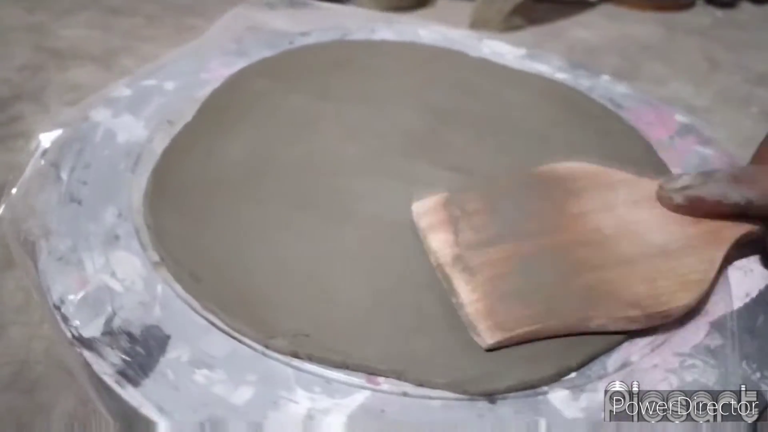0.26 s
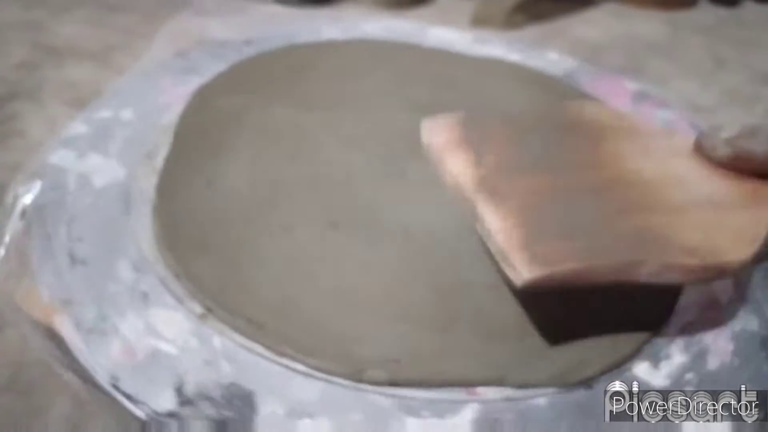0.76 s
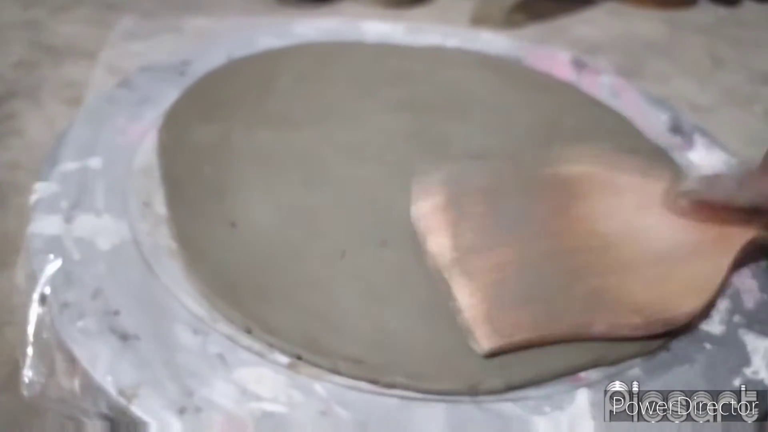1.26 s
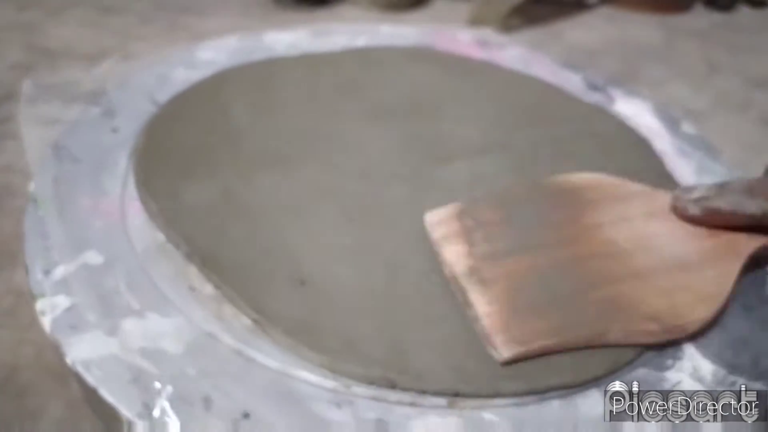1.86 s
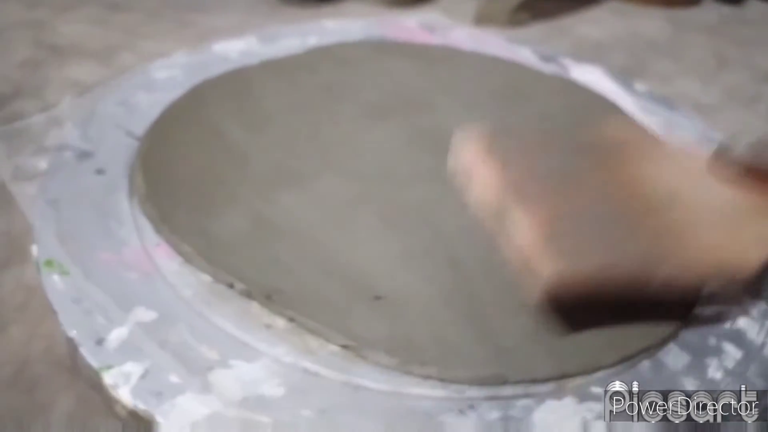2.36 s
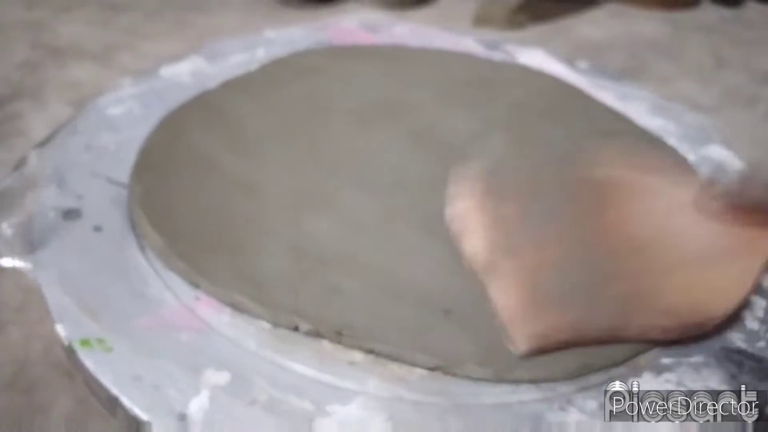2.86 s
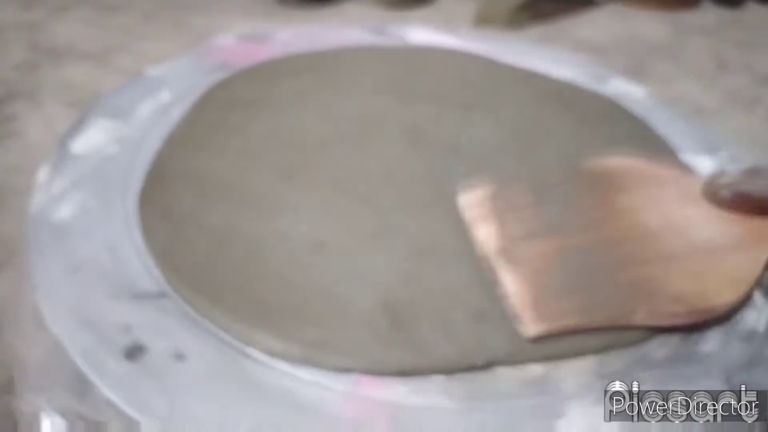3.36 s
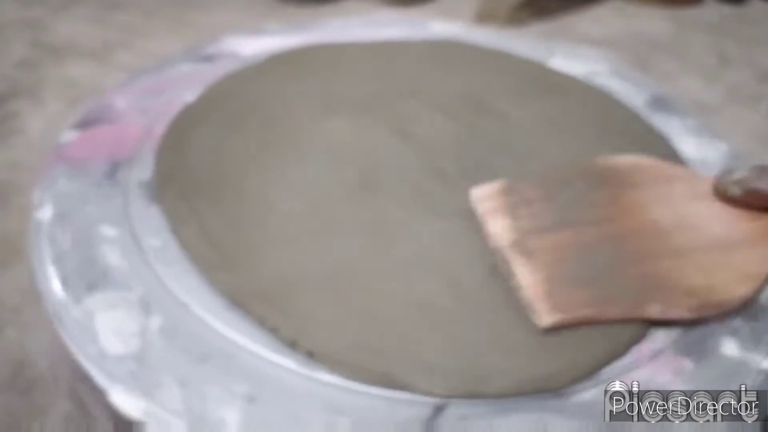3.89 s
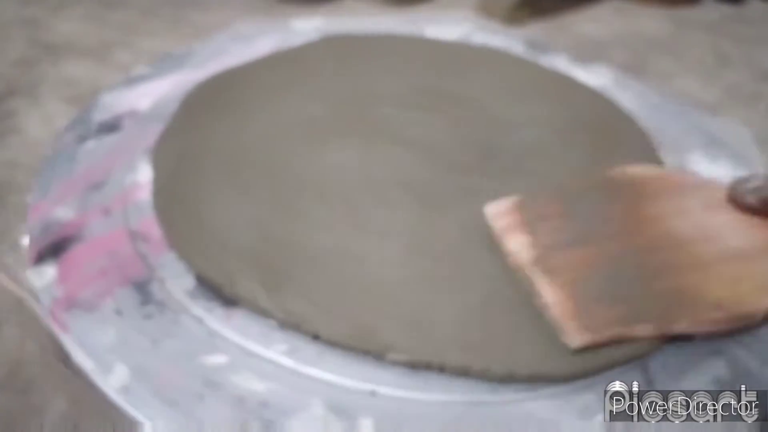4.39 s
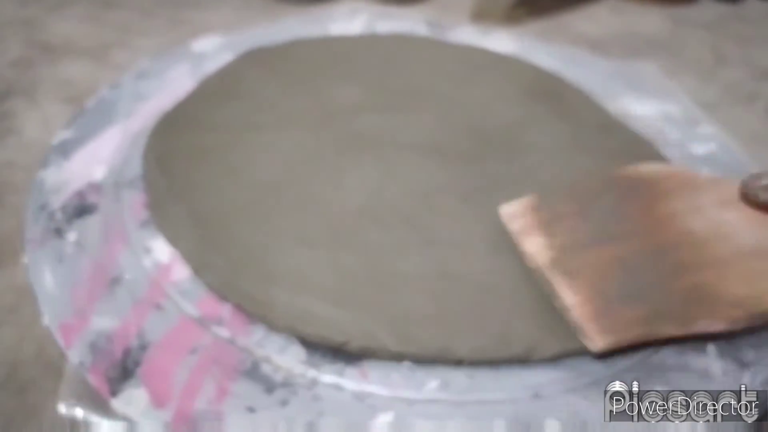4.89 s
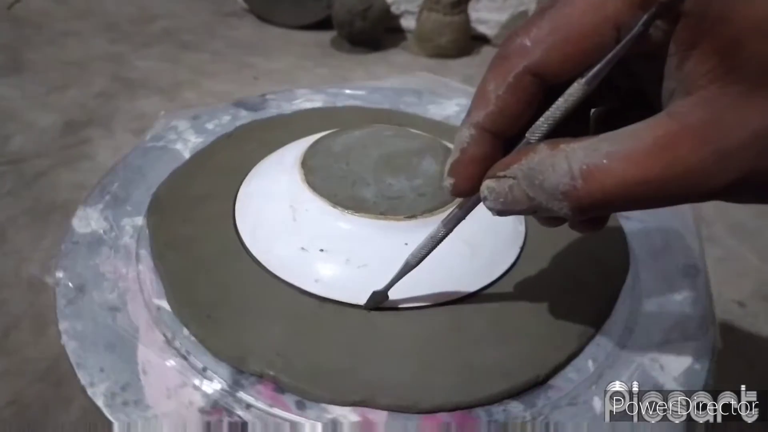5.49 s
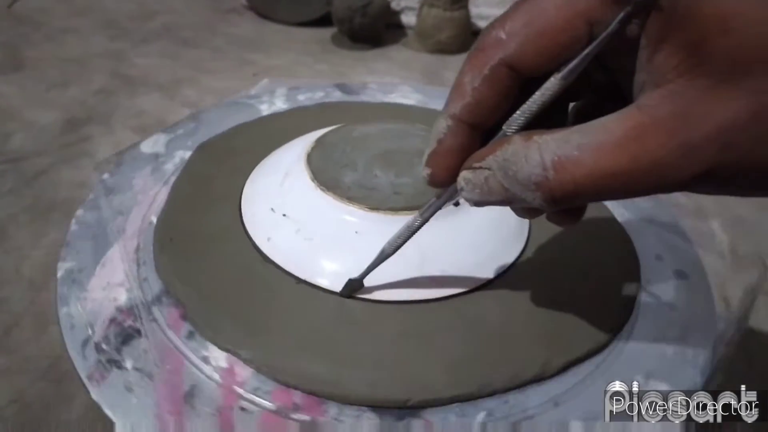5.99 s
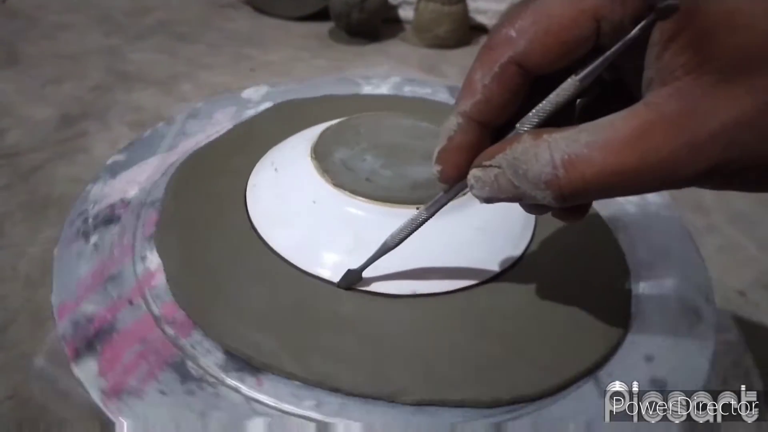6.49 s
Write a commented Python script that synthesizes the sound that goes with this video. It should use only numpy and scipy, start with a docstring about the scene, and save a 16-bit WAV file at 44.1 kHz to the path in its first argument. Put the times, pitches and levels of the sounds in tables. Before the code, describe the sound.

Close to the microphone in a small room, a flat wooden paddle pats wet clay about six times a second. Each pat is a crisp wet slap with a hollow pop and a soft board thud, with small sticky ticks and peeling crackle between. Near six seconds the sound drops to total silence briefly, then a needle tool drags faintly through clay, ticking against a dish over quiet room air.

```python
"""A flat wooden paddle pats a wet clay slab about six times a second in a small room, close to the microphone.
Each pat is three bands of shaped noise (clack, slap, spit), then sinking damped cycles for the hollow pop of
trapped air and the thud of the board, with a dull noise push, ringing modes and a diffuse room answer.
The clay clings and peels off with ticks and crackle. After a short silence a needle tool faintly clicks and
scrapes round a dish, cutting the slab. Behind lie room air, a wavering hum, thin hiss and handling rumble."""
import sys
import numpy as np
from scipy import signal
from scipy.fft import rfft, irfft, next_fast_len
from scipy.io import wavfile
from scipy.ndimage import uniform_filter1d

SR = 44100
rng = np.random.default_rng(int(sys.argv[2]) if len(sys.argv) > 2 else 0)


def unload_wav(signal):
    """Save mono or channel-first audio to the path in sys.argv[1] as 16-bit WAV at rate SR, clipped to [-1, 1]."""
    wavfile.write(
        sys.argv[1],
        SR,
        np.round(np.clip(np.atleast_2d(signal).T, -1, 1) * 32767).astype(np.int16),
    )


N = 297234
TIME = np.arange(N) / SR
LEAD = 64  # samples of run-up before each crack


def amp(db):
    """Decibels to gain."""
    return 10 ** (np.asarray(db) / 20)


def unit(x):
    """Scale to rms 1."""
    return x / np.sqrt(np.mean(x ** 2) + 1e-20)


def burst(x):
    """Scale a short sound to the energy of 10 ms at rms 1."""
    return unit(x) * np.sqrt(0.01 * SR / x.shape[-1])


def along(points, hz):
    """Read (frequency [Hz], value) points on a log frequency axis."""
    f, v = np.transpose(points)
    return np.interp(np.log(hz + 1), np.log(f + 1), v)


def filtered(x, response):
    """Multiply the spectrum of x by a response given as a function of frequency."""
    n = x.shape[-1]
    m = next_fast_len(n + 2048)  # spare length against wrap-around
    return irfft(rfft(x, m) * response(np.fft.rfftfreq(m, 1 / SR)), m)[..., :n]


def peak(f, hz, width):
    """One resonance: gain 1 at its centre, one half at the edges of its width."""
    return 1 / (1 + (2 * (f - hz) / width) ** 2)


def noise(spectrum, n, mono_hz):
    """Stereo noise of rms 1, whose channels grow more alike below mono_hz."""
    def response(f):
        side_gain = (f + mono_hz / 4) / (f + mono_hz)
        return amp(along(spectrum, f)) * np.array([np.ones_like(f), side_gain])

    mid, side = filtered(rng.standard_normal((2, n)), response)
    return unit(np.array([mid + side, mid - side]))


def add(track, s, sound):
    """Mix a sound into the track from time s."""
    i = max(round(s * SR), 0)
    track[:, i:i + sound.shape[-1]] += sound[..., :N - i]


def swell(t, peak_s, power):
    """An envelope that rises to 1 at peak_s and dies away."""
    u = np.maximum(t, 0) / peak_s
    return (u * np.exp(1 - u)) ** power


def hump(s, db, width_s):
    """A gain that swells smoothly to its top at time s, down to 1/e of it width_s to either side."""
    return amp(db) * np.exp(-((TIME - s) / width_s) ** 2)


# the ordinary blow, from which harder and wetter ones depart
USUAL_FORCE_DB, USUAL_WET_DB = -34, 3
# a harder blow squeezes the air pocket smaller, so it pops higher
POP_HZ, POP_HZ_PER_DB = 548, 6
# as the slab is beaten firm, the pop rises and the spit fades
POP_RISES_HZ_PER_S, SPIT_FADES_DB_PER_S = 12, 0.41
# slap and spit in the ordinary blow, and the dB they gain for each dB of force or wetness
SLAP_DB, SLAP_GROWTH = -30, 1.12
SPIT_DB, SPIT_GROWTH = -30, 0.83
# the clay cushions the board: it takes only a share of each dB of force and wetness
BOARD_DB, BOARD_PER_FORCE, BOARD_PER_WET = -36.5, 0.2, 0.23
# dB per dB of trapped air: it softens the thud, and adds to the dull push that follows
THUD_LOSS_PER_AIR, WEIGHT_PER_AIR = 0.4, 0.28

# paddle blows, close to the microphone: (time [s], force and clack level [dB], trapped air over the force [dB],
# wetness of the contact over the force [dB], pitch of the slap [Hz])
BLOWS = [(0.0276, -38, 2.5, -2, 3980), (0.1854, -34.5, 1.5, 1.5, 4740), (0.3438, -34.5, 3, 0.5, 4200),
         (0.4982, -37.0, 5.5, 0.5, 4070), (0.659, -36.5, 6.5, 5.5, 4700), (0.8146, -36.0, 4.0, 2.0, 4700),
         (0.9585, -34, 3.0, 2.5, 4800), (1.1166, -33.0, 4.5, 5.0, 4420), (1.2738, -32.5, 1.5, 0.5, 4100),
         (1.4222, -39, 0.5, 11.5, 4900), (1.5874, -26.0, -5.5, 5.0, 4750), (1.7511, -29.5, -3, 6.5, 4480),
         (1.91, -32.5, 0.5, 9.5, 5100), (2.0409, -29.5, 0.5, 5.5, 5200), (2.2062, -35.5, 2.5, 1.0, 4200),
         (2.3645, -32.5, 2, 4.5, 4350), (2.521, -32, 5, 4.0, 4060), (2.6754, -32, -8, 1, 4050),
         (2.8377, -28.5, 2.5, 3.5, 3650), (3.0033, -32.0, 3.0, 3.0, 4470), (3.1538, -27.0, -0.5, 4.5, 4500),
         (3.3128, -39.5, 4.5, 10.5, 4830), (3.4697, -30.0, 4.5, 2.0, 4350), (3.632, -29.0, 2.5, -1.0, 4830),
         (3.7927, -40.0, 0.5, 6.5, 4300), (3.9654, -33, 5, 5.5, 4440), (4.168, -41.5, 14.0, 1.5, 3600),
         (4.3484, -32.0, -5.0, -1.0, 5550), (4.5403, -38, 10, 1, 3700), (4.735, -39.5, 2.5, 11.0, 4350),
         (4.9288, -38.5, -2.5, -1.0, 4650), (5.104, -35.5, 4.0, 1.5, 4270),
         (5.2805, -39.5, -2.5, 7.0, 4250), (5.4605, -31.5, 1.0, 0.5, 4100), (5.6382, -33.5, 2.5, 1, 3800),
         (5.826, -35.0, -1.5, 2.5, 4330)]


def paddle(thud_db=-3, weight_db=-10.5, room_db=-8, low_room_db=-11.0, ring_db=14, pop_lag_s=0.00015, left_db=0.7):
    """Each blow: slap of the wet face, pop of the air squeezed out, thud of the board, weight on the slab."""
    out, blows = np.zeros((2, 2, N))
    push_colour = [(30, -19.0), (110, -1.5), (220, -1.5), (400, -2.5), (900, -46.5), (4000, -82)]
    for s, force_db, air_db, wet_db, slap_hz in BLOWS:
        harder, wetter = force_db - USUAL_FORCE_DB, wet_db - USUAL_WET_DB
        slap_db = SLAP_DB + SLAP_GROWTH * (harder + wetter)
        spit_db = SPIT_DB + SPIT_GROWTH * (harder + wetter) - SPIT_FADES_DB_PER_S * s
        slap = crack([force_db, slap_db, spit_db], spread=0.8, slap_hz=slap_hz)

        pop_hz = POP_HZ + POP_HZ_PER_DB * harder + POP_RISES_HZ_PER_S * s
        # the pop crests slightly later on the right
        pop_ears = [knock(pop_hz, peak_s=0.00417 + lag, power=16.9, sag=1.0) for lag in (0, pop_lag_s)]
        pop = amp(force_db + air_db) * np.array(pop_ears)

        board_db = BOARD_DB + BOARD_PER_FORCE * harder + BOARD_PER_WET * wetter
        thud_gain = amp(board_db + thud_db - THUD_LOSS_PER_AIR * air_db)
        thud = thud_gain * knock(328.6, peak_s=0.00876, power=6.9, sag=0.65)
        weight_gain = amp(board_db + weight_db + WEIGHT_PER_AIR * air_db)
        weight = weight_gain * puff(push_colour, peak_s=0.0065, power=1.9)

        low = pop + thud
        add(blows, s - LEAD / SR, slap)
        add(blows, s, low)
        add(out, s, weight)
        add(out, s - LEAD / SR, amp(room_db) * room(slap))
        add(out, s + 0.003025, amp(low_room_db) * room(low))
    add(out, 0.006, amp(ring_db) * ringing(blows))
    return (out + blows) * amp(left_db * np.array([[0.5], [-0.5]]))


# colour of wet wood meeting clay: (frequency [Hz], level [dB per Hz])
CONTACT_COLOUR = [(200, 0), (800, 11), (930, -3.5), (1060, 4.5), (1200, -1), (1320, 3), (1800, 3),
                  (2050, -4), (2900, -3), (3500, 2.5), (4300, 2), (4650, 0), (5100, 3), (5900, -3),
                  (7200, -6.5), (8500, -9.5), (11500, -6.5), (14500, -10), (16000, -26.5)]
# borders of the clack, slap and spit bands: (frequency [Hz])
BAND_EDGES = [800, 2800, 6200, 16500]
# balance of the direct sound at the microphone: (frequency [Hz], left minus right level [dB])
STEREO_LEAN = [(300, -22), (1200, 2), (2200, -1), (3700, -5.5), (4400, -1), (5300, 5), (8000, 3.5),
               (11000, -1), (14000, 7.5)]
# flat spectrum, also used for the background bands: (frequency [Hz], level [dB])
FLAT = [(20, 0), (20000, 0)]


def crack(levels_db, spread, slap_hz=4300, even=0.26, lag_s=0.000096, focus=1.57):
    """A contact closing: the top spits first, slap and clack crest within the next few milliseconds."""
    t = np.arange(SR // 40) / SR
    clack_shape = swell(t, 0.002 * spread, power=1.13)
    slap_shape = swell(t, 0.0012 * spread, power=0.8)
    spit_shape = swell(t, 0.00042 * spread, power=0.27)

    def ears(f):
        # the left side is nearer and hears it first
        balance = amp(np.outer([0.5, -0.5], along(STEREO_LEAN, f)))
        return balance * np.exp(-2j * np.pi * np.outer([0, lag_s], f))

    def colour(f):
        # the thin gap under the face rings at a pitch set by how it lands
        return amp(along(CONTACT_COLOUR, f)) * (1 + focus * peak(f, slap_hz, width=800))

    out = 0
    shapes = [clack_shape, slap_shape, spit_shape]
    for db, shape, lo, hi in zip(levels_db, shapes, BAND_EDGES, BAND_EDGES[1:]):
        z = rfft(noise(FLAT, len(t), mono_hz=3930) * shape)
        # partly flatten the burst's own spectrum, so that its colour is smoother
        evened = z / (np.abs(z) + 1e-9) ** even
        smack = np.pad(irfft(evened, len(t)), ((0, 0), (LEAD, 0)))

        def response(f):
            band = 1 / (1 + (lo / (f + 1)) ** 12) / (1 + (f / hi) ** 12)
            return ears(f) * colour(f) * band

        out = out + amp(db) * burst(filtered(smack, response))
    return out


def knock(hz, peak_s, power, sag):
    """A few heavily damped cycles whose pitch sinks as the paddle settles; pressure crests at the peak."""
    t = np.arange(SR // 25) / SR
    # the pitch passes through hz at the peak
    pitch = hz * (1 + sag * (np.exp(1 - t / peak_s) - 1) / np.e)
    cycles = np.cumsum(pitch) / SR
    cycles_at_peak = np.interp(peak_s, t, cycles)
    return burst(swell(t, peak_s, power) * np.cos(2 * np.pi * (cycles - cycles_at_peak)))


def puff(colour, peak_s, power):
    """A short dull push of air: coloured noise under one swell."""
    t = np.arange(SR // 20) / SR
    return burst(noise(colour, len(t), mono_hz=906) * swell(t, peak_s, power))


# board, room and paddle ringing after a blow: (frequency [Hz], relative gain on resonance [dB], t60 [s])
RING_MODES = [(270.7, -20, 0.11), (350.6, -22, 0.097), (424, -11, 0.14), (455.6, -17.5, .2),
              (475, -19.5, 0.29), (1302, -16.5, 0.055), (1780, -26, 0.063), (3670, -23, .14),
              (3550, -29, 0.15), (4270, -20, .13), (4270, -18, 0.1), (4380, -11.5, 0.052),
              (4730, -23.5, 0.097)]


def ringing(x):
    """The modes that a blow leaves sounding: decaying sines, each scaled by its gain on resonance."""
    t = np.arange(SR // 3) / SR
    modes = np.zeros(len(t))
    for hz, db, t60 in RING_MODES:
        resonance_scale = 2 * np.log(1000) / (t60 * SR)
        modes += amp(db - 60 * t / t60) * np.sin(2 * np.pi * hz * t) * resonance_scale
    return signal.fftconvolve(x, modes[None], axes=1)


# colour of the small room's answer: (frequency [Hz], level [dB])
ROOM_SPECTRUM = [(100, 12), (300, 2.5), (500, -0.5), (800, 8), (1500, 2), (3000, 8), (4300, 1), (6000, 4),
                 (11000, 5), (15000, 2)]
# how long the room answers: (frequency [Hz], t60 [s])
ROOM_DECAY = [(200, 0.43), (500, 0.19), (1500, 0.2), (4300, 0.19), (12000, 0.17)]


def room(x, first_s=0.0014, build_s=0.002):
    """The diffuse answer from floor and walls: convolution with noise that decays by its own t60 per frequency."""
    hz, t, z = signal.stft(noise(ROOM_SPECTRUM, SR // 3, mono_hz=450), SR, nperseg=256)
    decay = amp(-60 * t / along(ROOM_DECAY, hz)[:, None])
    tail = signal.istft(z * decay, SR, nperseg=256)[1]
    age = np.maximum(np.arange(tail.shape[1]) / SR - first_s, 0)
    tail = tail * (1 - np.exp(-age / (build_s / 2)))
    return signal.fftconvolve(x, tail / np.sqrt(np.sum(tail ** 2) / 2), axes=1)


# the slab lifts with the paddle and flops back on the board: (time [s], level [dB])
SLAB_FLOPS = [(0.979, -37.5), (1.431, -42)]


def flops(flop_hz=366, ring_db=8):
    """A soft, late bump of damped cycles that leaves the board ringing faintly."""
    out = np.zeros((2, N))
    for s, db in SLAB_FLOPS:
        add(out, s, amp(db) * knock(flop_hz, peak_s=0.00876, power=4.0, sag=0.1))
    return out + amp(ring_db) * ringing(out)[:, :N]


def click(levels_db, spread, room_db):
    """A light contact with no weight behind it, and its faint room answer."""
    direct = crack(levels_db, spread)
    out = amp(room_db) * room(direct)
    add(out, 0, direct)
    return out


# paddle edge grazing and coming unstuck:
# (time [s], spit level before the overall gain [dB], firmness of the contact over the spit [dB])
EDGE_TICKS = [(1.5701, -45.5, -6), (1.5748, -32, -3.5), (1.6156, -34, -9), (1.649, -36.5, 0.5),
              (2.1774, -47, -7), (2.256, -48.5, -6.5), (2.6135, -29.5, -17), (2.6258, -33, -7.5),
              (2.726, -43, -3), (2.9921, -37.5, 0.5), (3.7859, -36.5, -5), (3.8758, -46.5, -14),
              (3.928, -30, -10.5), (3.933, -32, -4), (3.959, -33, -12), (3.9874, -30, -15),
              (4.0592, -43, -6), (4.1896, -32.5, -5.5), (4.2516, -52, 3.5), (5.6971, -43.5, 5),
              (5.71, -37.5, -4), (5.761, -48.5, -2.5)]
# soft, dull touches on the clay, one during the patting, three as the needle arrives: (time [s], level [dB])
SOFT_TOUCHES = [(3.0968, -43.5), (6.104, -56), (6.188, -57), (6.2880, -57.5)]


def ticks(gain_db=-1.0, clack_db=-13):
    """The paddle's edge grazes and comes unstuck in light cracks; soft touches are only dull puffs of noise."""
    out = np.zeros((2, N))
    for s, spit_db, firm_db in EDGE_TICKS:
        slap_db = spit_db + firm_db
        tick = click([slap_db + clack_db, slap_db, spit_db], spread=1.0, room_db=-12)
        add(out, s - LEAD / SR, amp(gain_db) * tick)
    touch_colour = [(60, -22), (350, -2.5), (800, -5.5), (1700, -7.5), (3200, -31), (9000, -35.0)]
    for s, db in SOFT_TOUCHES:
        add(out, s, amp(db) * puff(touch_colour, peak_s=0.0016, power=0.9))
    return out


# colour of wet crackle: (frequency [Hz], level [dB per Hz])
WET_COLOUR = [(300, -26), (1500, -9.5), (2800, -11), (3700, 1), (5000, -8.5), (8000, -4.5), (11000, 2),
              (14500, -1.5), (16000, -23)]


def crackle(n, grain_db):
    """Countless tiny wet threads breaking: noise whose level jumps about in millisecond clumps."""
    clumps = unit(uniform_filter1d(rng.standard_normal(n), size=40))
    return unit(noise(WET_COLOUR, n, mono_hz=1500) * amp(grain_db * clumps))


# wet clay peeling off the wood: (start time [s], end time [s], level at the end [dB])
CLAY_PEELS = [(2.54, 2.565, -18.5), (3.847, 3.942, -43), (3.967, 3.998, -30.5), (4.285, 4.342, -47.5),
              (5.522, 5.545, -40), (5.681, 5.693, -41.5), (5.769, 5.84, -49)]


def peeling(grain_db=4.0, grows_db_per_s=128.5, room_db=-12):
    """Clinging clay tears away louder and louder, then lets go."""
    out = np.zeros((2, N))
    for start, end, end_db in CLAY_PEELS:
        n = max(round((end - start) * SR), SR // 200)
        from_end_s = (np.arange(n) - n) / SR
        tear = crackle(n, grain_db) * amp(end_db + grows_db_per_s * from_end_s)
        add(out, start, tear)
        add(out, start, amp(room_db) * room(tear))
    return out


# the needle slips and ticks against the dish: (time [s], slap level [dB], spit level [dB])
NEEDLE_SLIPS = [(6.2847, -75, -56.5), (6.4563, -54, -54.5), (6.5226, -66, -54), (6.6355, -63, -47.5)]
# the silence between patting and cutting: (start time [s], end time [s])
PAUSE = (5.882, 6.072)


def needle(drag_db=-69.5, scrape_db=-11.5, scrape_lead_s=0.013, scrape_width_s=0.034):
    """The point drags steadily through the clay, swelling just before it slips and ticks against the dish."""
    drag = amp(drag_db) * (TIME > PAUSE[1])
    for s, _, spit_db in NEEDLE_SLIPS:
        drag = drag + hump(s - scrape_lead_s, spit_db + scrape_db, scrape_width_s)
    out = drag * crackle(N, grain_db=5)
    for s, slap_db, spit_db in NEEDLE_SLIPS:
        add(out, s - LEAD / SR, click([slap_db - 6.0, slap_db, spit_db], spread=1.9, room_db=-6.5))
    return out


# room air at the microphone: (frequency [Hz], relative level [dB per Hz])
AIR_COLOUR = [(15, 15), (30, 18), (55, 9.5), (130, 8.5), (210, 0), (290, 9), (450, 2), (1000, -4.5),
              (2300, -11.5), (4300, -9.5), (7500, -14.5), (11500, -8), (14800, -15), (16000, -47)]
# hum during the patting: (frequency [Hz], level [dB])
ROOM_HUM = (95.5, -67.5)
# narrow band of hiss during the patting: (frequency [Hz], width [Hz], level [dB])
ROOM_HISS = (5750, 210, -69.5)
# a thin high hiss that swells once: (time [s], level [dB], half length [s])
HIGH_SIZZLE = (4.73, -64, .3)
# swells of low handling rumble: (time [s], level [dB], half length [s])
HANDLING_SWELLS = [(5.76, -48, 0.11), (6.168, -39.5, .12)]


def background(air_db=-60.5, cutting_db=-3, hum_drop_db=-5, waver=0.53):
    """Room air, a wavering hum and thin hiss, quieter during the cutting, with a sizzle and handling rumble."""
    cutting = TIME > PAUSE[0]

    def narrow(hz, width):
        return unit(filtered(noise(FLAT, N, mono_hz=1500), lambda f: peak(f, hz, width)))

    air = amp(air_db + cutting_db * cutting) * noise(AIR_COLOUR, N, mono_hz=150)
    hum_hz, hum_db = ROOM_HUM
    # slow random drift of the hum's phase; waver is its rms in radians
    drift = unit(filtered(rng.standard_normal(N), lambda f: peak(f, 0, width=2.5)))
    hum = amp(hum_db) * unit(np.sin(2 * np.pi * hum_hz * TIME + waver * drift))
    hiss_hz, hiss_width_hz, hiss_db = ROOM_HISS
    hiss = amp(hiss_db) * narrow(hiss_hz, hiss_width_hz)
    sizzle = hump(*HIGH_SIZZLE) * narrow(9800, 450)
    rumble_colour = [(8, 18.0), (20, -10.5), (35, -18), (70, -44.0), (200, -69), (1000, -120)]
    rumble = noise(rumble_colour, N, mono_hz=13) * sum(hump(*row) for row in HANDLING_SWELLS)
    return air + amp(hum_drop_db * cutting) * (hum + hiss) + sizzle + rumble


def scene():
    """Patting, then cutting, over the quiet room."""
    return paddle() + flops() + ticks() + peeling() + needle() + background()


def record(dry, top_hz=16000):
    """The sound drops out between the two jobs; a steep low-pass removes what lies above top_hz."""
    playing = (TIME < PAUSE[0]) | (TIME > PAUSE[1])
    live = uniform_filter1d(playing * 1.0, size=400)  # short fades at the edges
    return filtered(dry * live, lambda f: 1 / (1 + (f / top_hz) ** 90))


dry = scene()
out = record(dry)
unload_wav(out)
```